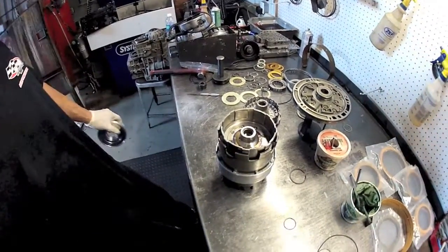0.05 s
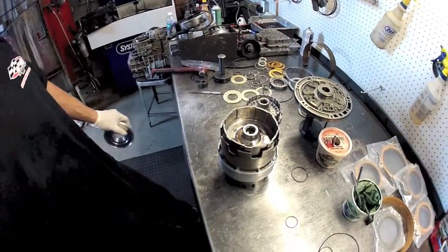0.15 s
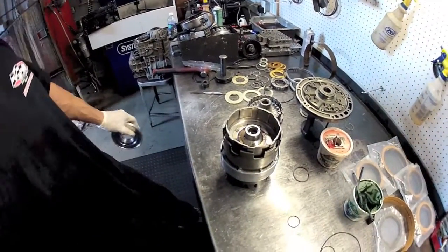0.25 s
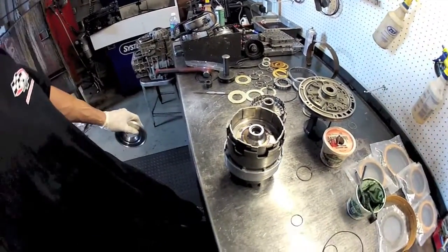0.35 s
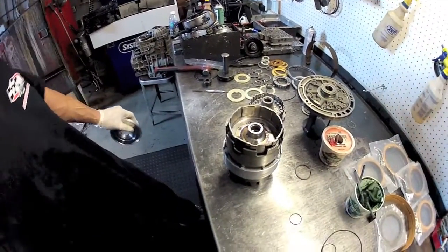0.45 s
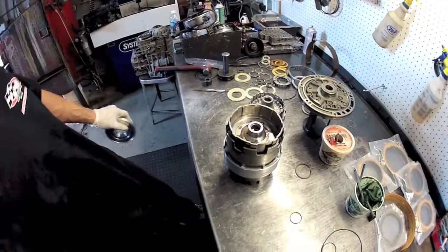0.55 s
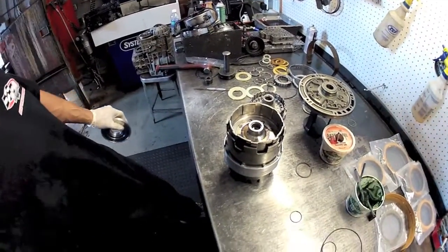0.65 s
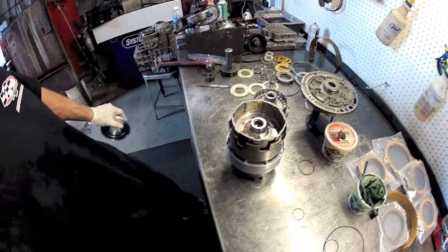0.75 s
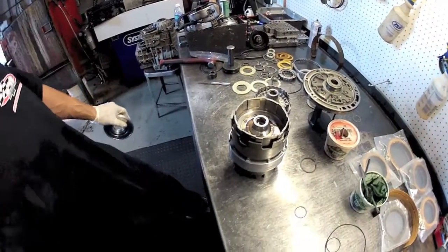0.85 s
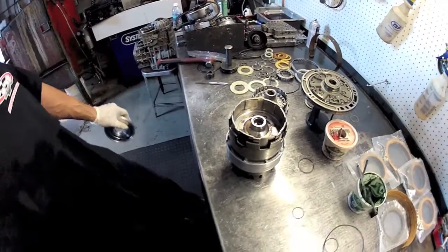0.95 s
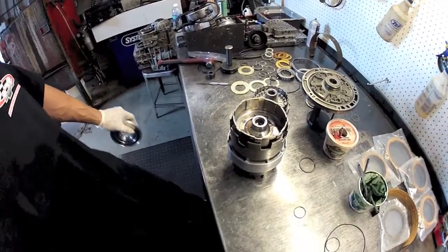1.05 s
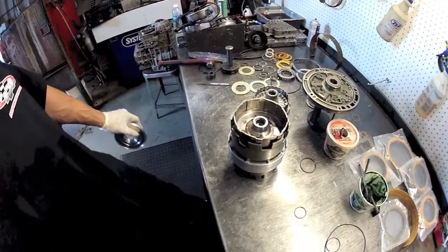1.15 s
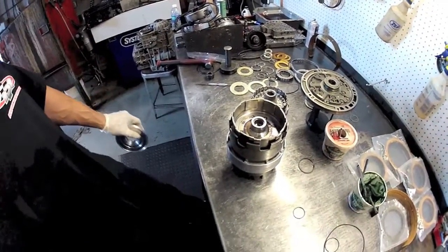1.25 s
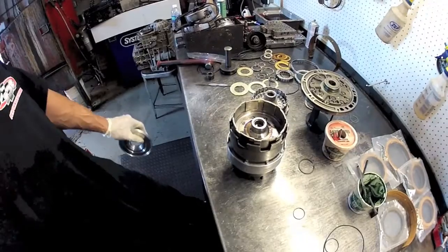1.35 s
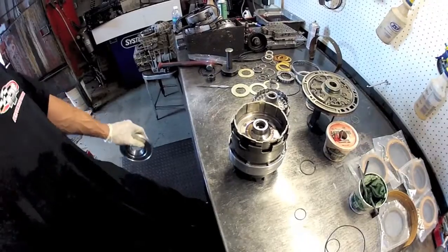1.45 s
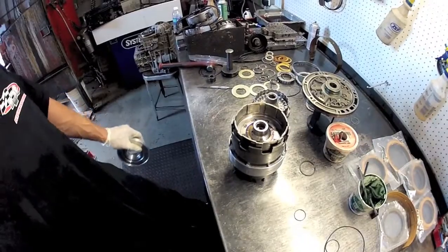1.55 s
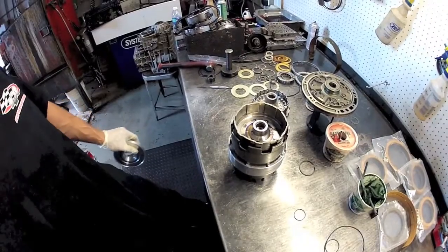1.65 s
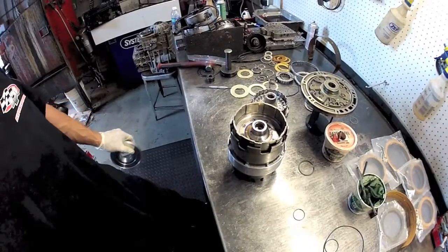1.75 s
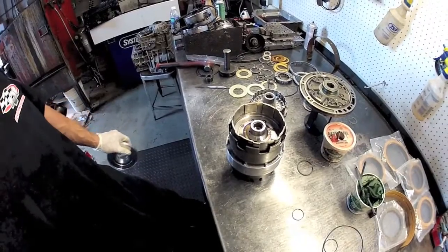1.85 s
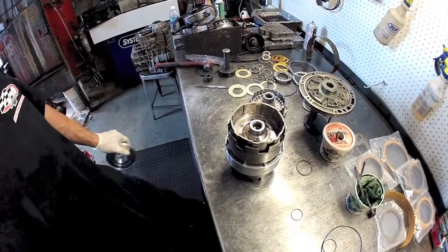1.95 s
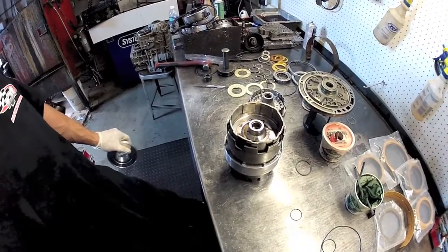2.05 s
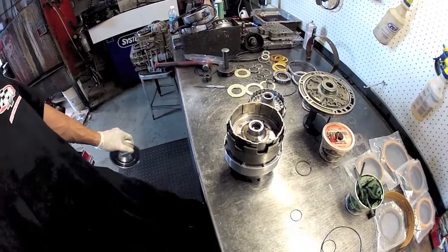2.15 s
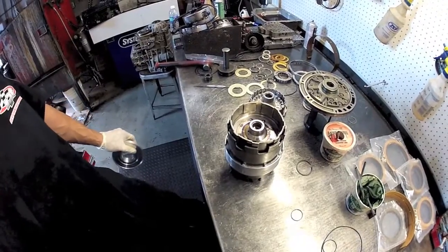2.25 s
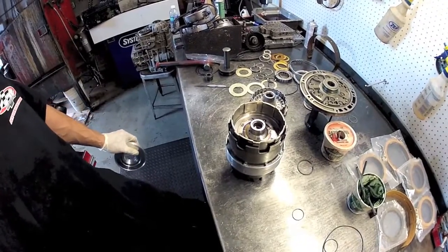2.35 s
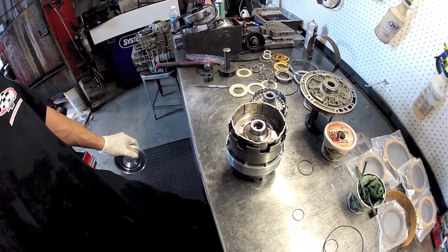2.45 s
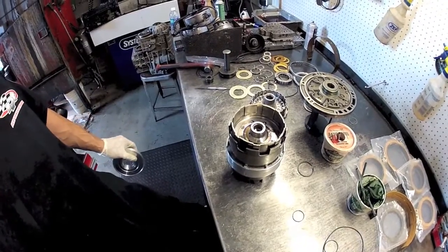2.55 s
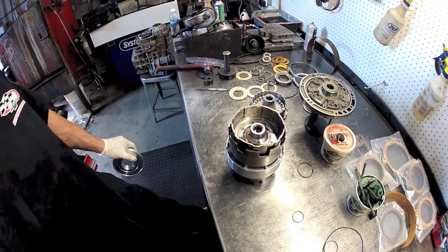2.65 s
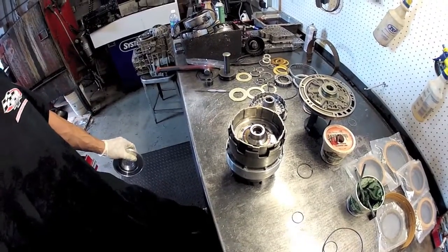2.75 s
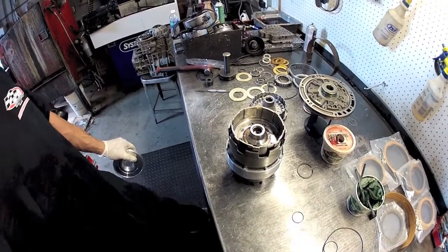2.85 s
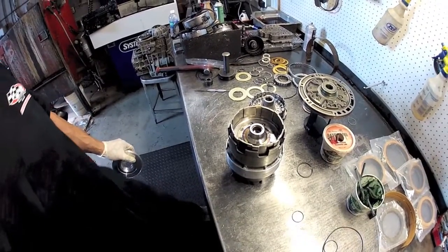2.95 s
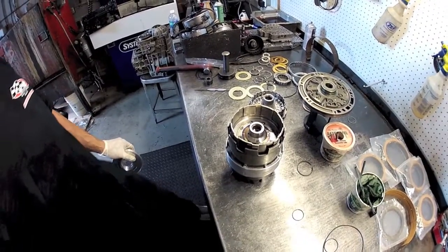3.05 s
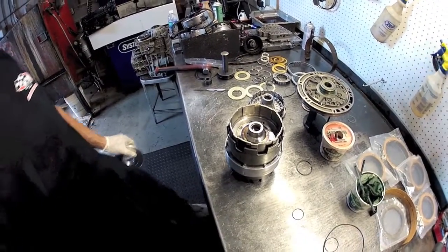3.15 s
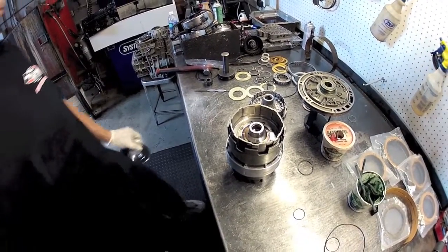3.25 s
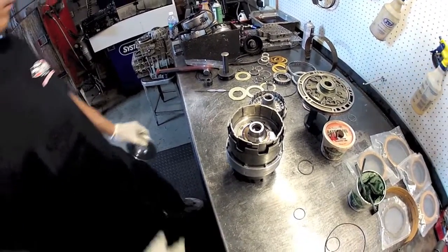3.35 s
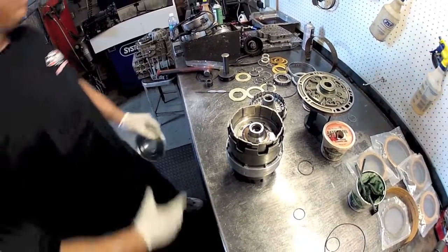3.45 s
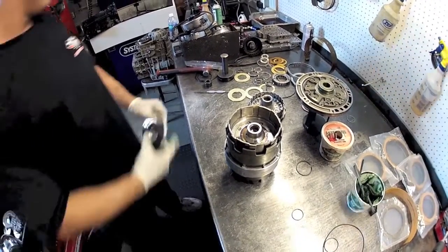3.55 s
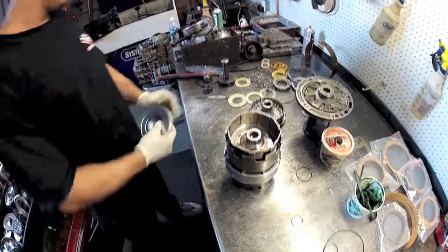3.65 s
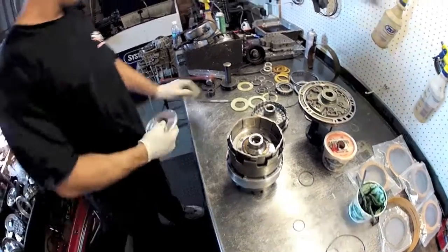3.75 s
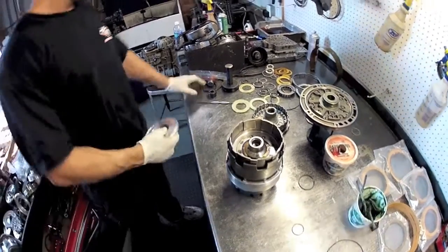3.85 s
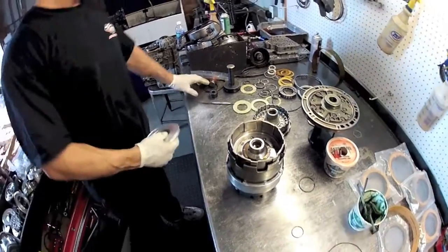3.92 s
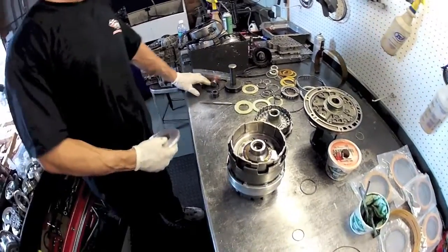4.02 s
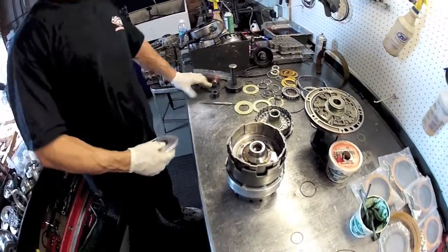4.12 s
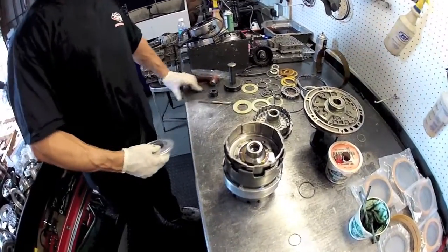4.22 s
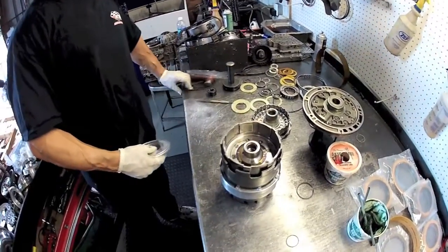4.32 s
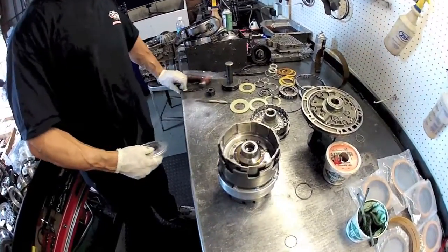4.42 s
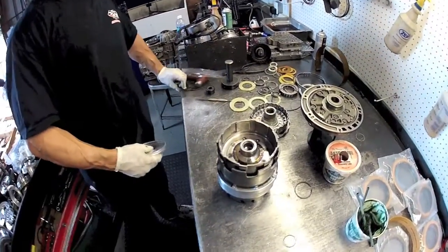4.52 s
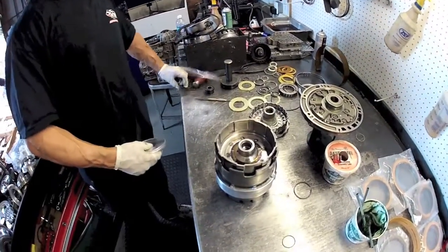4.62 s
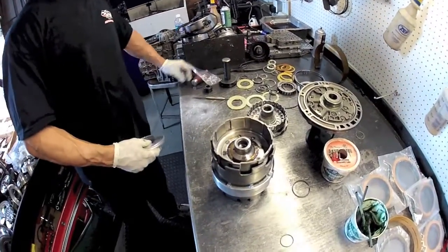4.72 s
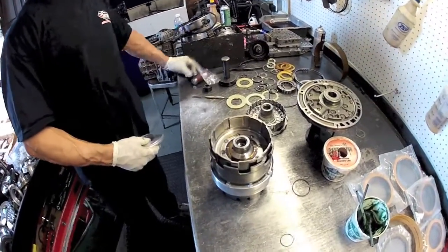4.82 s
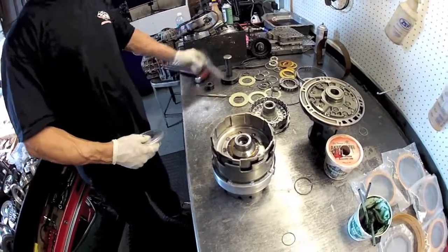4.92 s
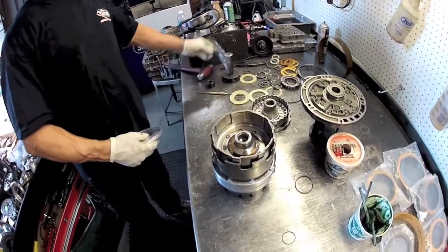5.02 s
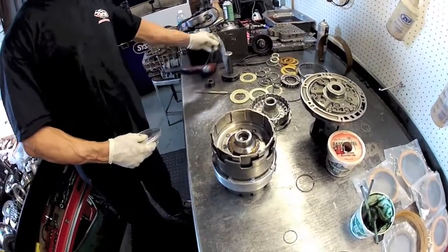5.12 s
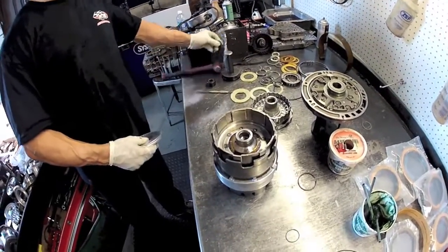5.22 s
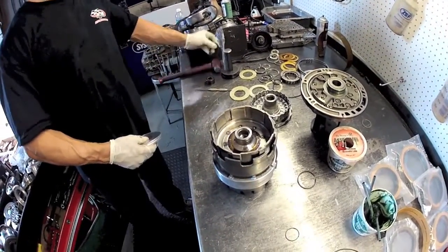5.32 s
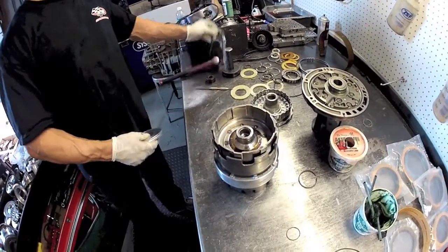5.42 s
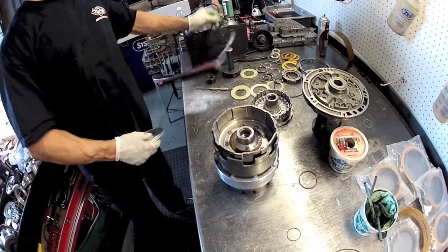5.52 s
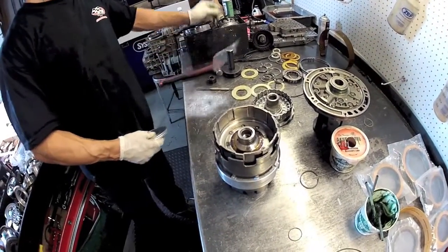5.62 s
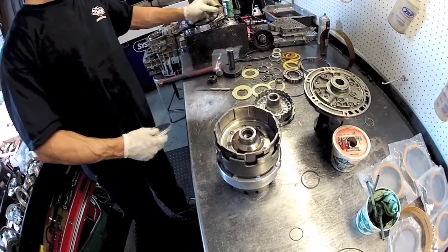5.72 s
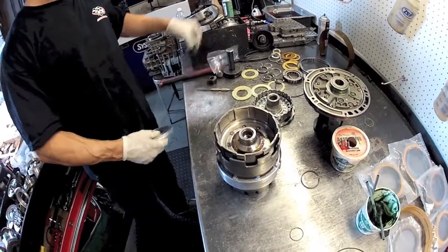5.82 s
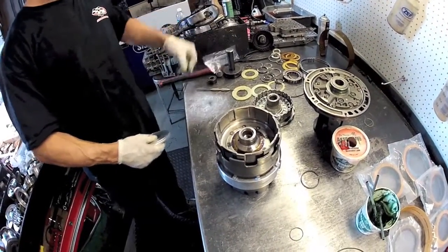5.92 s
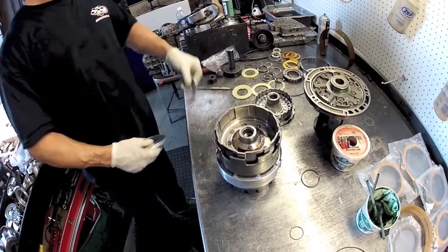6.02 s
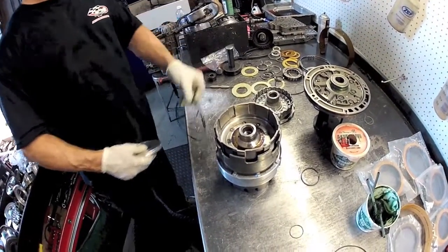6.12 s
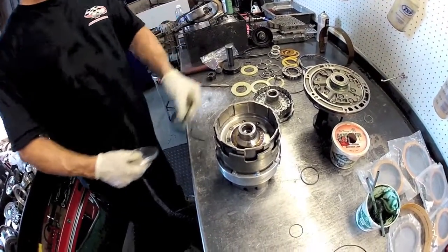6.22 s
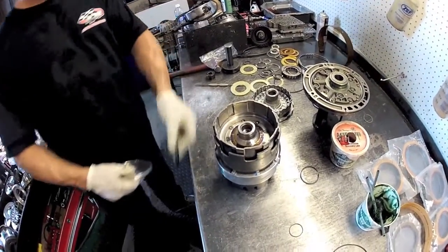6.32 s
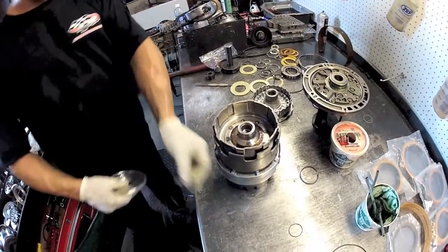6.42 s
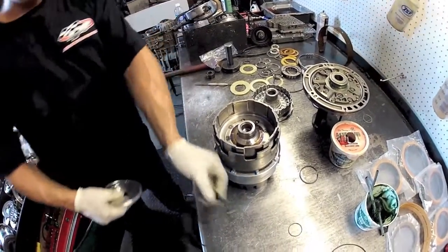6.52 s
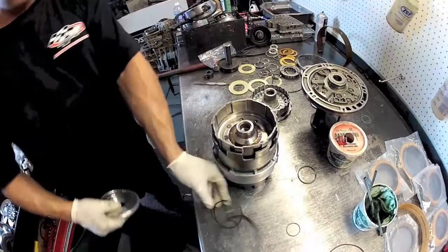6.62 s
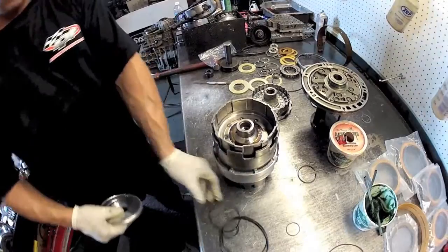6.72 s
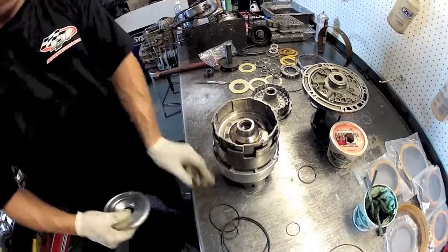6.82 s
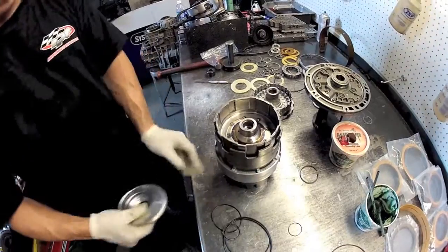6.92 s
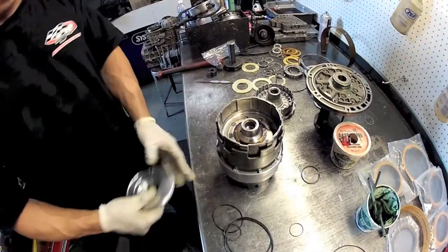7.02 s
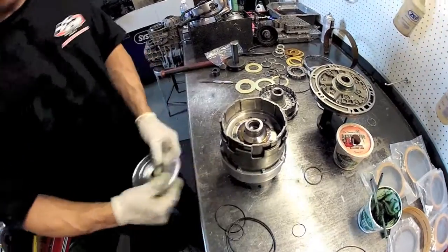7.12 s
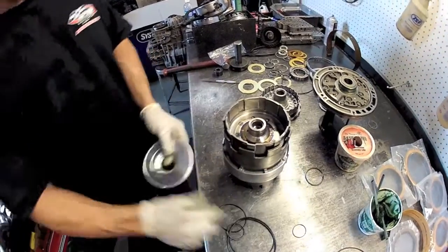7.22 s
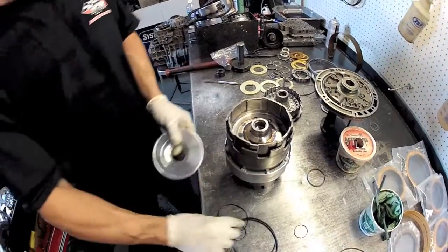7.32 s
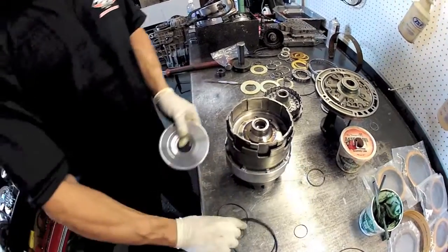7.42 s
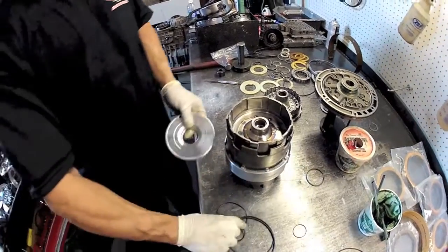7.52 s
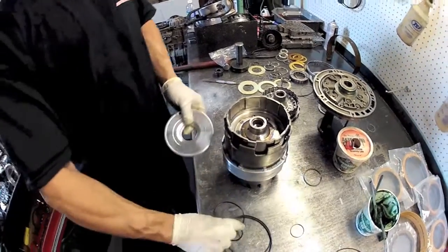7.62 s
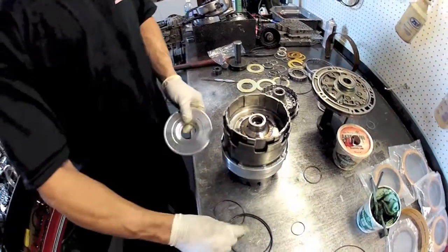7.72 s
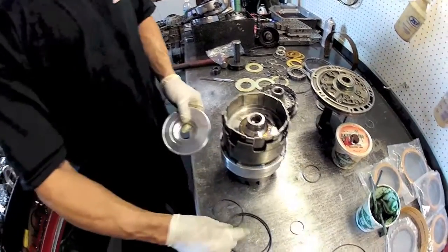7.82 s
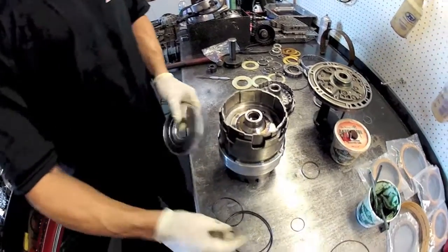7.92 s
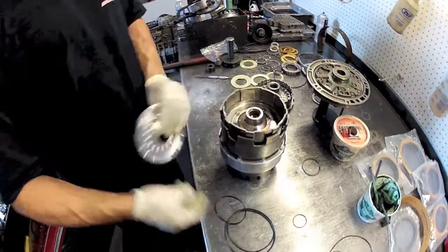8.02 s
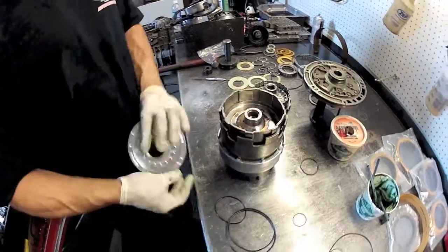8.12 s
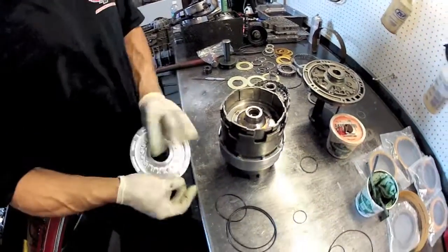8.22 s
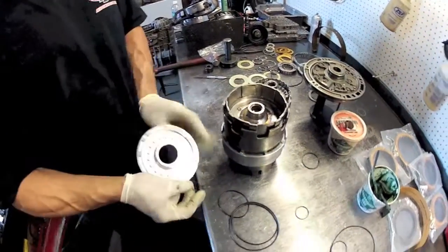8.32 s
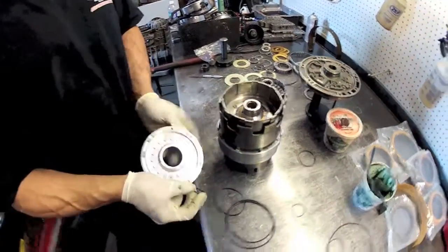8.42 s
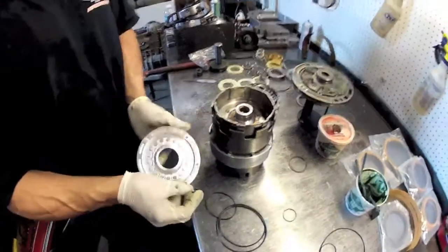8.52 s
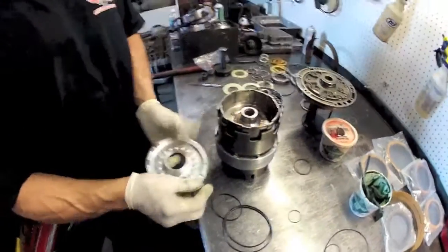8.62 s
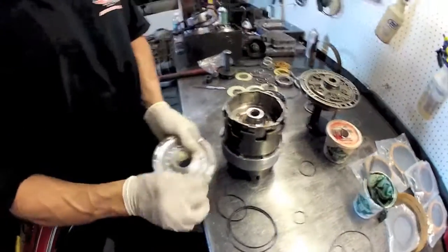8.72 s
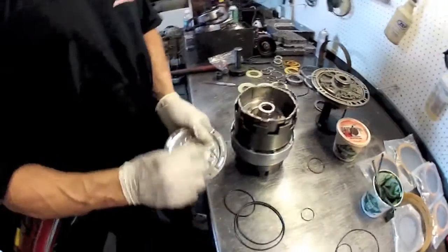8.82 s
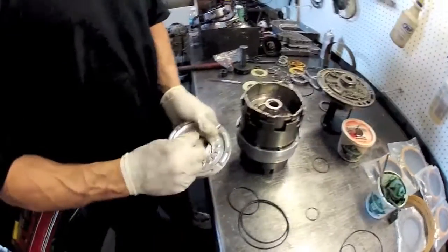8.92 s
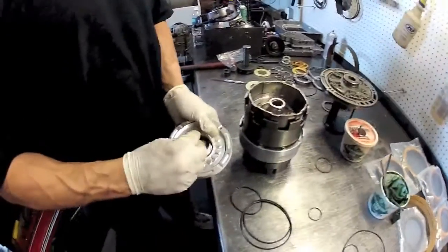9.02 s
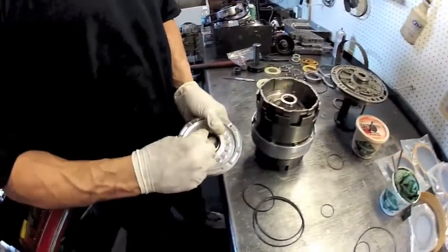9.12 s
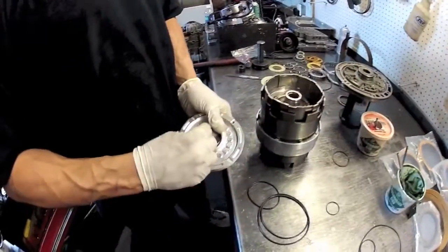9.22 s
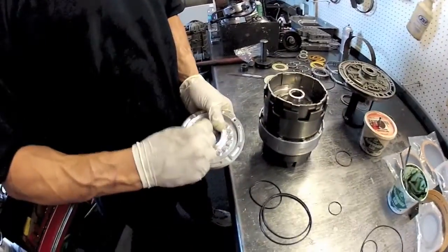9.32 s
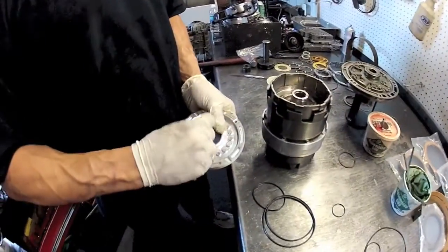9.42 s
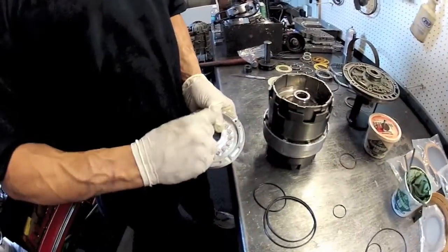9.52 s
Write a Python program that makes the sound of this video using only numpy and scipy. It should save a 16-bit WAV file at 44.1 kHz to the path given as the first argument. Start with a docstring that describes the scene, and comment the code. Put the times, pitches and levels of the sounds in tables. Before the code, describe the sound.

Close to the bench, plastic rustles and pops for about three seconds over quiet air rumble. A gloved hand brushes and slips on metal, a modest clank arrives, then several loud steel blows land in quick succession with booming bench resonance and a short, bright room tail. The rest is sparse: soft brushing, a light knock, tiny metallic ticks, and faint pinging rubs of a hand-held steel disc.

```python
"""Heavy steel parts clank down on a sheet-metal workbench in a small, humming workshop: each blow is
a noise crack, clank and thud, and sets decaying steel and bench modes ringing. Before that, plastic
crinkles for three seconds as clumped grains and snaps. A gloved hand turns a steel disc: slipping rubber
pumps up its modes, among small ticks, dull bumps and brushing. The microphone hears each source directly,
by way of the room, or both."""
import sys
import numpy as np
from scipy import signal
from scipy.fft import rfft, irfft, next_fast_len
from scipy.io import wavfile
from scipy.ndimage import uniform_filter1d

SR = 44100
rng = np.random.default_rng(int(sys.argv[2]) if len(sys.argv) > 2 else 0)


def inscribe(sig):
    """Save sig as 16-bit PCM at rate SR to the path in sys.argv[1].

    A 1-D sig is mono; a 2-D sig holds one channel per row.
    Samples are clipped to [-1, 1] before scaling.
    """
    pcm = np.round(np.clip(np.atleast_2d(sig).T, -1, 1) * 32767)
    wavfile.write(sys.argv[1], SR, pcm.astype(np.int16))


N = 421596


def gain_of(db):
    """Decibels to amplitude."""
    return 10 ** (np.asarray(db) / 20)


def evened(x):
    """Scales to rms 1."""
    return x / np.sqrt(np.mean(x ** 2) + 1e-20)


def read(points, hz):
    """Reads a table on a log-frequency axis."""
    table_hz, value = np.transpose(points)
    return np.interp(np.log(hz + 1), np.log(table_hz + 1), value)


def add(mix, s, sound):
    """Mixes a sound in at time s."""
    part = mix[max(round(s * SR), 0):][:len(sound)]
    part += sound[:len(part)]


def colour(x, db_at):
    """Filters x by a rule that gives dB for each frequency; rms 1."""
    size = next_fast_len(len(x))
    hz = np.fft.rfftfreq(size, 1 / SR) + 1
    return evened(irfft(rfft(x, size) * gain_of(db_at(hz)), size)[:len(x)])


def noise(db_at, size):
    """Coloured noise of rms 1."""
    return colour(rng.standard_normal(size), db_at)


def hump(hz, centre_hz, skirt_db):
    """A broad resonance whose skirts fall towards skirt_db an octave."""
    return -skirt_db * (np.hypot(np.log2(hz / centre_hz), .5) - .5)


# decay of the workshop: (frequency [Hz], t60 [s])
ROOM_DECAY = [(100, 0.76), (300, .5), (1000, .55), (2500, 0.67), (5000, 0.63), (9000, 0.64), (15000, 0.74)]


def tail(parts, rise=0.0013):
    """Diffuse sound after bursts (spectrum rule, size): it builds up, then dies band by band."""
    hz = np.fft.rfftfreq(512, 1 / SR) + 1
    t = np.arange(150)[:, None] * 256 / SR
    power = sum((size * evened(gain_of(db_at(hz)))) ** 2 for db_at, size in parts)
    cells = rng.standard_normal((len(t), len(hz), 2)) @ [1, 1j]
    cells = cells * np.sqrt(power) * gain_of(-60 * t / read(ROOM_DECAY, hz))
    dying = signal.istft(cells.T, SR, nperseg=512)[1]
    dying = dying * (1 - np.exp(-np.arange(len(dying)) / SR / rise))
    return evened(dying) * np.sqrt(power.mean() / len(dying))


def room(x, early_db=-6, early_t60=0.1):
    """Dense reflections from the near bench and wall, together with the tail."""
    late = tail([(np.zeros_like, 1)])
    t = np.arange(len(late)) / SR
    hits = rng.random(len(late)) < 4000 / SR  # 4000 reflections per second
    taps = rng.standard_normal(len(late)) * hits * gain_of(-60 * t / early_t60)
    early = gain_of(early_db) * taps / np.linalg.norm(taps)
    return signal.oaconvolve(x, early + late)[:N]


# treble dips of the microphone housing at depth 1: (frequency [Hz], half-width [Hz], level [dB])
HOUSING_DIPS = [(5970, 860, -23), (11500, 1700, -1.5)]


def housing(x, depth):
    """The microphone housing dulls two treble bands, deepest for sound from all around."""
    for hz, half_width_hz, db in HOUSING_DIPS:
        band = signal.lfilter(*signal.iirpeak(hz, hz / (2 * half_width_hz), SR), x)
        x = x - (1 - gain_of(db * depth)) * band
    return x


# spectrum of the ventilation rumble: (frequency [Hz], relative level [dB per Hz])
AIR_SPECTRUM = [(12, -34), (20, -27), (53, 2.5), (177, -8), (204, -4.5), (234, -10), (388, -11.5),
                (446, -17), (574, -17), (759, -21), (2820, -31), (6010, -32.5), (12800, -43.5),
                (16000, -57.5)]
AIR_DB = -55.5  # rms
# mains hum: (frequency [Hz], rms level [dB])
HUM_TONES = [(59.6, -67), (119, -69.5), (237, -71), (328, -75), (447, -77), (877, -85)]


def background(waver=0.75):
    """Ventilation rumble and a mains hum whose phases wander by up to waver cycles."""
    t, knots = np.arange(N) / SR, np.arange(40) / 4  # a new phase every 0.25 s
    hum = 0
    for hz, db in HUM_TONES:
        wander = waver * np.interp(t, knots, rng.random(len(knots)))
        hum = hum + gain_of(db) * np.sqrt(2) * np.sin(2 * np.pi * (hz * t + wander))
    return hum + gain_of(AIR_DB) * noise(lambda hz: read(AIR_SPECTRUM, hz), size=N)


# sleeve and glove brush past things: (time [s], length [s], level before the grain [dB])
BRUSH_STROKES = [(2.514, 0.11, -62.5), (2.695, .15, -53), (2.994, 0.52, -68.5), (3.517, 0.35, -64),
                 (3.801, 0.22, -57.5), (4.137, 0.33, -66), (4.885, 0.41, -65), (5.123, 0.096, -51),
                 (6.636, 0.088, -56.5), (7.066, 0.16, -61), (7.558, 0.0836, -63.5), (8.355, 0.29, -66),
                 (8.542, 0.353, -70), (9.426, 0.18, -70)]


def brushes(grain_db=3.0):
    """Friction of sleeve and glove: soft swells of noise with a fluctuating grain."""
    effort = np.zeros(N)
    for s, length, db in BRUSH_STROKES:
        add(effort, s, gain_of(db) * np.hanning(round(length * SR)))
    grain = evened(uniform_filter1d(rng.standard_normal(N), size=200))
    return effort * gain_of(grain_db * grain) * noise(lambda hz: hump(hz, 1700, skirt_db=6), size=N)


# feet, the hammer's handle and the jolted bench:
# (time [s], level before rise and decay [dB], centre [Hz], t60 [s])
DULL_BUMPS = [(0.594, -39.5, 150.2, 0.22), (1.767, -40, 193.5, 0.18), (1.79, -38.5, 64.6, 0.2),
              (4.238, -53, 130, .3), (4.515, -41, 80, .25), (4.765, -35, 324, 0.11), (4.80, -35, 160, 0.11),
              (4.834, -45, 89.5, 0.39), (5.104, -33, 294, 0.31), (5.142, -36, 330, 0.22),
              (5.239, -25, 100, 0.19), (5.31, -30, 90.4, 0.13), (5.599, -27, 100, .08),
              (5.702, -34, 60, 0.55), (8.428, -44.5, 237, 0.26)]


def bumps(rise=0.021):
    """Dull bumps: low noise with a soft onset, dying without any ring."""
    out, t = np.zeros(N), np.arange(16384) / SR
    for s, db, centre_hz, t60 in DULL_BUMPS:
        thump = noise(lambda hz: hump(hz, centre_hz, skirt_db=18.5), size=len(t))
        add(out, s, thump * gain_of(db - 60 * t / t60) * (1 - np.exp(-t / rise)))
    return out


def clicks(rows, spectrum, t60, rise, skirt_db, ring_db, ring_t60):
    """Small dry bursts of noise, each with one brief resonance at its centre of colour."""
    out, t = np.zeros(N), np.arange(4096) / SR
    for s, db, centre_hz in rows:
        click = noise(lambda hz: read(spectrum, hz) + hump(hz, centre_hz, skirt_db), size=len(t))
        click = click * gain_of(-60 * t / t60)
        ring = gain_of(ring_db - 60 * t / ring_t60) * np.sin(2 * np.pi * centre_hz * t)
        add(out, s, gain_of(db) * (click + ring) * (1 - np.exp(-t / rise)))
    return out


# the plastic is squeezed: (time [s], length [s], level before the slack is taken off [dB])
PLASTIC_SQUEEZES = [(0, 0.069, -52), (0.047, 0.09, -47.5), (0.172, 0.058, -56), (.295, 0.019, -44.5),
                    (0.457, 0.03, -62), (0.555, .14, -53.5), (0.687, .2, -45), (0.924, 0.12, -52),
                    (1.452, 0.085, -56.5), (1.742, 0.053, -42.5), (1.818, 0.097, -43.5),
                    (1.915, 0.081, -46.5), (2.087, 0.043, -44), (2.189, 0.033, -45), (2.548, 0.017, -43),
                    (2.716, 0.029, -40), (2.772, .046, -45)]
GRAB_S, RELAX_T60 = 0.0025, .06  # s to take hold, t60 once the squeeze is over
SLACK_DB = -7.5  # taken 1.5 times at the ends of a squeeze, 0.5 times at its height
HELD_UNTIL_S, HELD_DB = 2.3, -73  # between squeezes the held plastic keeps rustling faintly


def squeezing():
    """How hard the plastic is worked: a light hold, and an arch of effort for each squeeze."""
    effort = gain_of(HELD_DB) * (np.arange(N) / SR < HELD_UNTIL_S)
    t = np.arange(SR) / SR
    for s, length, db in PLASTIC_SQUEEZES:
        arch = np.sin(np.pi * np.minimum(t / length, 1))
        relaxing_db = -60 * np.maximum(t - length, 0) / RELAX_T60
        add(effort, s, np.minimum(t / GRAB_S, 1) * gain_of(db + SLACK_DB * (1.5 - arch) + relaxing_db))
    return effort


# spectrum of the plastic: (frequency [Hz], relative level [dB per Hz])
PLASTIC_SPECTRUM = [(100, 0), (350, 1.5), (650, -6.5), (1100, -0.5), (1700, 0), (3000, -2), (4700, -2.5),
                    (7500, -5.5), (10300, -13.5), (12000, -28), (14500, -12.5)]


def crinkle(per_s=1500, spread_db=1.5, clump_db=3.0):
    """Countless tiny buckles of plastic, in clumps, as loud as it is squeezed hard."""
    sizes = gain_of(spread_db * np.minimum(rng.exponential(1, N), 4)) * rng.choice([-1, 1], N)
    buckles = sizes * (rng.random(N) < per_s / SR)
    grains = colour(buckles, lambda hz: read(PLASTIC_SPECTRUM, hz))
    clumps = evened(uniform_filter1d(rng.standard_normal(N), size=350))
    return evened(grains * gain_of(clump_db * clumps)) * squeezing()


# smaller snaps fall at random within these ranges
FAINT_SNAPS_PER_S, FAINT_SNAP_DB, FAINT_SNAP_HZ = 40, (-52.5, -45.5), (1300, 2010)


def faint_snaps(worked_db=-63):
    """Rows (time [s], level [dB], centre [Hz]) of small snaps, only while the plastic is worked."""
    when, keep, size, pitch = rng.random((600, 4)).T
    worked = squeezing()[(when * N).astype(int)] > gain_of(worked_db)
    kept = keep < FAINT_SNAPS_PER_S * N / SR / len(when)
    db = np.interp(size, [0, 1], FAINT_SNAP_DB)
    centre_hz = np.interp(pitch, [0, 1], FAINT_SNAP_HZ)
    return list(np.transpose([when * N / SR, db, centre_hz])[worked & kept])


# sharp snaps of the plastic: (time [s], level before rise and decay [dB], centre [Hz])
PLASTIC_SNAPS = [(0.082, -41, 3080), (0.0982, -49, 1510), (0.1445, -38, 1900), (0.181, -39, 1530),
                 (0.207, -45.5, 1700), (0.243, -43, 1540), (0.5071, -45, 4877), (0.5964, -42.5, 1387),
                 (0.8892, -46, 2360), (0.9378, -36, 1895), (0.968, -43, 1400), (1.0138, -41, 1575),
                 (1.0907, -44, 1550), (1.1014, -42, 1190), (1.141, -41.5, 1560), (1.1506, -45, 2490),
                 (1.1835, -40.5, 1200), (1.234, -43.5, 1920), (1.259, -39.5, 1315), (1.7669, -38.5, 1148),
                 (1.8815, -41, 2040), (1.935, -33.5, 2030), (2.1025, -35, 3700), (2.1784, -39.5, 3520),
                 (2.533, -44, 1600)]


def plastic():
    """Crinkling plastic: fine buckling under sharp and faint snaps."""
    snaps = clicks(PLASTIC_SNAPS + faint_snaps(), PLASTIC_SPECTRUM, t60=0.018, rise=0.00037,
                   skirt_db=1.5, ring_db=-5, ring_t60=0.024)
    return crinkle() + snaps


# light ticks of small parts: (time [s], level before rise and decay [dB], centre [Hz])
PART_TICKS = [(3.5853, -42.5, 2590), (3.699, -44.5, 4550), (3.8511, -38.5, 5460), (4.7596, -44, 3635),
              (5.023, -47.5, 4830), (5.0548, -42.5, 3992), (6.6215, -50.5, 5400), (6.6583, -42, 4370),
              (6.782, -44, 5000), (7.0458, -51, 5280), (7.4119, -48, 4610), (7.5909, -57, 2544),
              (7.887, -43, 2110), (8.0222, -51, 4790), (8.066, -44, 3870), (8.0805, -41, 3940),
              (8.3769, -41.5, 3190), (8.4058, -46, 2370), (8.5727, -48, 4700), (8.6864, -46, 5370),
              (8.8622, -47, 4830), (8.9601, -52, 5005)]
# spectrum of steel clanks and ticks: (frequency [Hz], relative level [dB per Hz])
CLANK_SPECTRUM = [(60, -13), (300, -4.5), (460, 0.5), (700, -5.5), (1050, -1.5), (1400, 0), (1850, -2.5),
                  (2400, -2), (3100, -1.5), (4700, 0.5), (7500, -1.5), (9500, -8.5), (12000, -21),
                  (15000, -11.5)]


def ticks():
    """Small parts tick: short clicks in the colour of the clanks."""
    return clicks(PART_TICKS, CLANK_SPECTRUM, t60=0.015, rise=0.0014,
                  skirt_db=7.5, ring_db=-9, ring_t60=0.032)


# ring of the hand-held disc:
# (frequency [Hz], relative level [dB], t60 [s], how much a touch near the rim favours the mode [0-1])
DISC_MODES = [(1728, -16, 0.22, 0), (3435, -16, 0.1, .8), (4603, 1, 0.07, 0), (4540, -8, 0.07, 0.1),
              (5005, -6, 0.13, 0.9), (6995, -10, 0.11, 1), (7397, -2, .09, 0.1), (7440, -7, 0.035, 0.2),
              (8556, -24, 0.11, 1), (10270, -28, 0.2, 0.1), (13730, -31, .15, 0)]
# the glove slips on the disc:
# (time [s], length [s], highest short-term rms level [dB], lift of the rim modes [dB])
GLOVE_SLIPS = [(3.323, 0.042, -61, -7), (3.663, 0.0094, -53, 4), (3.696, 0.064, -63, 5),
               (3.749, 0.025, -51.5, -5), (3.793, 0.018, -54, -5), (7.16, 0.021, -41.5, -8),
               (7.198, 0.011, -59, 3), (7.269, 0.0085, -62, -6), (7.372, 0.022, -61.5, 2.5),
               (7.95, 0.043, -72, -6), (8.102, 0.019, -61, -7), (8.129, .009, -51.5, -4),
               (8.151, 0.05, -64, 10), (8.203, 0.049, -60, 4), (8.247, 0.06, -66, 15),
               (8.313, 0.0078, -47.5, 3), (8.414, 0.027, -58.5, 17.5), (8.454, 0.012, -59.5, 2.5),
               (8.592, .02, -60.5, 2), (8.904, 0.0023, -51.5, 15)]


def disc(flutter_db=3):
    """Slipping rubber pumps the modes of the disc up; the gripping hand damps them."""
    out, t = np.zeros(N), np.arange(10000) / SR
    for s, length, db, rim_db in GLOVE_SLIPS:
        push, tone = np.sin(np.pi * np.minimum(t / length, 1)), 0
        for hz, mode_db, t60, at_rim in DISC_MODES:
            flutter = evened(uniform_filter1d(rng.standard_normal(len(t)), size=90))
            pumping = push * gain_of(flutter_db * flutter)
            # the mode stores the push and leaks at its own decay rate
            swell = signal.lfilter([1], [1, -gain_of(-60 / SR / t60)], pumping)
            wave = np.sin(2 * np.pi * (hz * t + rng.random()))
            tone = tone + gain_of(mode_db + at_rim * rim_db) * swell * wave
        loudest = np.sqrt(uniform_filter1d(tone ** 2, size=200).max())
        add(out, s, gain_of(db) * tone / loudest)
    return out


def excited(modes, strikes):
    """Modes store the energy of strikes (s, dB for each mode) and lose it at their own rates."""
    out, t = np.zeros(N), np.arange(N) / SR
    for k, (hz, db, t60) in enumerate(modes):
        gained = np.zeros(N)
        for s, strike_db in strikes:
            gained[round(s * SR)] += gain_of(db + strike_db[k]) ** 2
        energy = signal.lfilter([1], [1, -gain_of(-60 / SR / t60) ** 2], gained + 1e-30)
        out += np.sqrt(energy) * np.sin(2 * np.pi * (hz * t + rng.random()))
    return out


# heavy steel meets the bench; levels before rise, decay and the offsets below:
# (time [s], clank level [dB], tilt [dB per octave], clank peak [Hz], thud level [dB],
# thud centre [Hz], lingering sound [dB])
STEEL_BLOWS = [(4.4899, -26.5, -1.3, 1354, -25.5, 409.6, -6.5), (4.4956, -26, -2, 1600, -28.5, 328.7, -3.5),
               (5.1837, -15.5, -1.5, 2334, -17, 420, -1), (5.188, -17.5, -0.5, 3277, -24.5, 399.5, -2),
               (5.228, -35, 0.5, 3694, -25, 230.1, 0), (5.253, -27, -3, 4372, -29, 130, 1.5),
               (5.3054, -19, 0.06, 2600, -21, 351, -1), (5.367, -45.5, -3.5, 1000, -25, 239.5, 0.5),
               (5.386, -20, -2.2, 2400, -22, 251, -1.5), (5.574, -45, -1, 1000, -27, 232, -1),
               (5.581, -26.5, -2.5, 2500, -22, 219, 1), (5.589, -30.5, -2, 1194, -22.5, 260, -1.5),
               (5.606, -12.5, -1.6, 1020, -17.5, 180, -2.5), (5.6078, -17.5, -1.5, 3944, -23, 251, -2.5),
               (6.677, -52, -2, 4517, -52, 410.6, 1), (6.694, -45.5, -2, 900, -39, 320, -4.5),
               (6.7051, -38, -.9, 4730, -43.5, 330, -3)]
# ring of the heavy steel: (frequency [Hz], relative level [dB], t60 [s])
STEEL_MODES = [(875, -39.5, 1.6), (1003, -32.5, 1.3), (1024, -16, .12), (1153, -22.5, 0.15),
               (1373, -14.5, 0.098), (1880, -40.5, 0.66), (2320, -17, 0.13), (2590, -22.5, 0.14),
               (3099, -23, 0.16), (3400, -21, .14), (3630, -18.5, 0.11), (4100, -18.5, 0.14),
               (4370, -17, 0.14), (5100, -16, 0.12), (7219, -50.5, 0.91), (10993, -57, 1.5),
               (13011, -59.5, 1.4)]
# ring of the bench top: (frequency [Hz], relative level [dB], t60 [s])
BENCH_MODES = [(59, -14, .8), (95.2, -1, 0.36), (220.5, -1, 0.37), (272.5, -9.5, 0.35), (338.5, -6.5, .17),
               (474, -5, 0.25)]
BLOOM_S = 0.0072  # the bench top takes this long to start moving


def ringing(steel_db=0, bench_db=-1, skirt_db=10):
    """Steel and bench top ring on; a thud wakes mostly the bench modes near its own pitch."""
    on_steel, on_bench = [], []
    bench_hz = np.array(BENCH_MODES)[:, 0]
    for s, db, _, _, thud_db, thud_hz, linger_db in STEEL_BLOWS:
        on_steel.append((s, np.full(len(STEEL_MODES), db + linger_db + steel_db)))
        woken_db = hump(bench_hz, thud_hz, skirt_db)
        on_bench.append((s + BLOOM_S, thud_db + linger_db + bench_db + woken_db))
    return excited(STEEL_MODES, on_steel) + excited(BENCH_MODES, on_bench)


CLANK_T60, THUD_T60 = 0.07, 0.12  # s


def blows(rise=.0005, thud_rise=0.0019, crack_db=0.0, crack_s=0.0066, clank_db=-1, peak_db=6,
          clank_room_db=-3.0, thud_room_db=-4):
    """Each blow is a hard crack, a clank and a thud, all noise. Gives direct and diffuse sound."""
    direct, diffuse, t = np.zeros(N), np.zeros(N), np.arange(8192) / SR
    for s, db, tilt_db, clank_hz, thud_db, thud_hz, linger_db in STEEL_BLOWS:
        def bright(hz):
            peak = peak_db / (1 + (np.log2(hz / clank_hz) / 0.1) ** 2)
            return read(CLANK_SPECTRUM, hz) + tilt_db * np.log2(hz / 2000) + peak

        def dull(hz):
            return hump(hz, thud_hz, skirt_db=13.5)

        crack_fade = gain_of(db + crack_db) * np.exp(-(t / crack_s) ** 2)
        clank_fade = gain_of(db + clank_db - 60 * t / CLANK_T60)
        clank = noise(bright, size=len(t)) * (crack_fade + clank_fade)
        thud = noise(dull, size=len(t)) * gain_of(thud_db - 60 * t / THUD_T60)
        add(direct, s, clank * (1 - np.exp(-t / rise)) + thud * (1 - np.exp(-t / thud_rise)))
        radiated = [(bright, gain_of(clank_room_db) * np.linalg.norm(clank)),
                    (dull, gain_of(thud_room_db) * np.linalg.norm(thud))]
        add(diffuse, s, gain_of(linger_db) * tail(radiated))
    return direct, diffuse


def scene():
    """Sums direct and room sound at the microphone, with a faint stereo rumble."""
    heavy, diffuse = blows()
    crinkling, ticking, disc_ring = plastic(), ticks(), disc()
    diffuse = diffuse + room(gain_of(-8) * crinkling + ticking + gain_of(-13.5) * disc_ring)
    direct = housing(heavy + ringing() + ticking + disc_ring, depth=.15) + housing(crinkling, depth=0.76)
    mono = direct + housing(diffuse + brushes() + bumps() + background(), depth=1.1)
    # the two channels differ only in a faint rumble of opposite sign
    side = gain_of(-81) * noise(lambda hz: hump(hz, 25.85, skirt_db=5), size=N)
    return np.array([mono + side, mono - side])


EDGE_HZ = 15600  # upper band limit


def record(dry):
    """Clips peaks beyond 0.9, then limits the band."""
    low_pass = signal.firwin(255, EDGE_HZ, window=("kaiser", 8), fs=SR)
    return signal.oaconvolve(np.clip(dry, -.9, .9), low_pass[None], "same")


dry = scene()
out = record(dry)
inscribe(out)
```